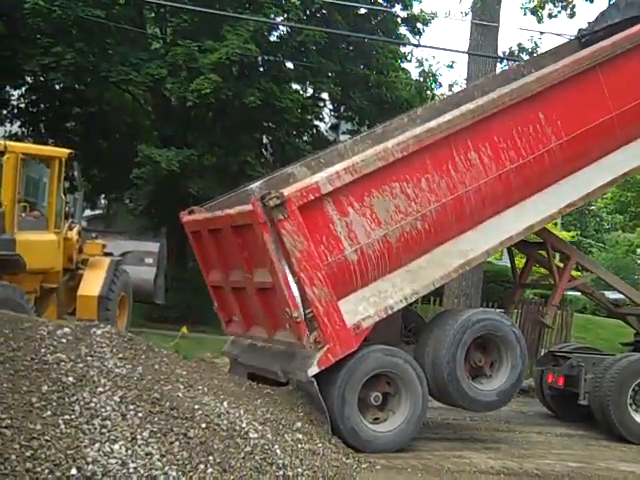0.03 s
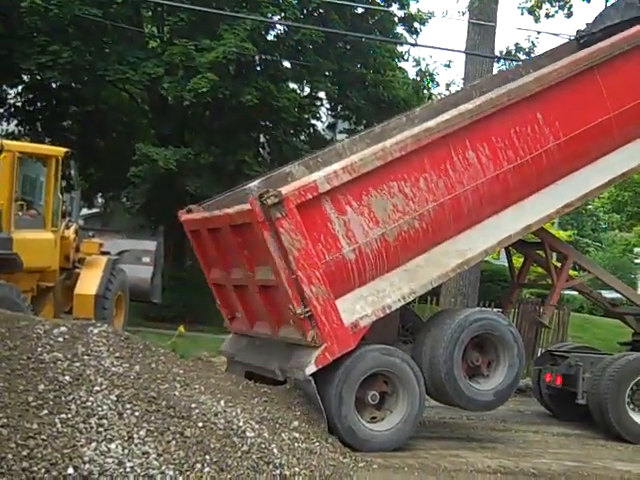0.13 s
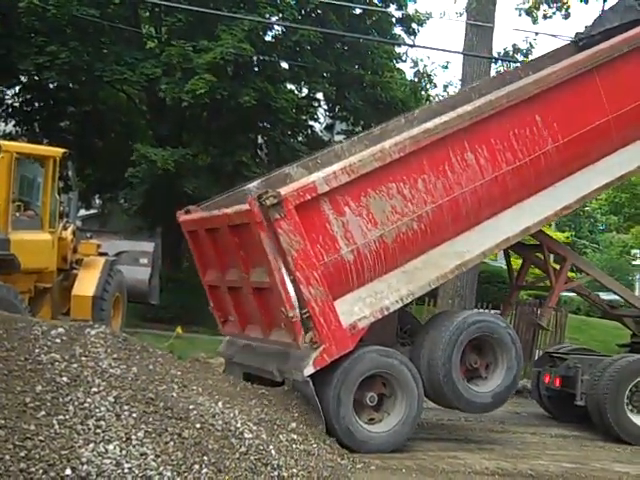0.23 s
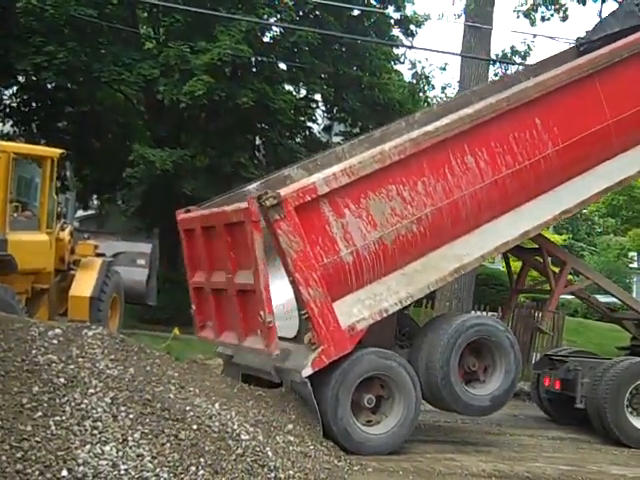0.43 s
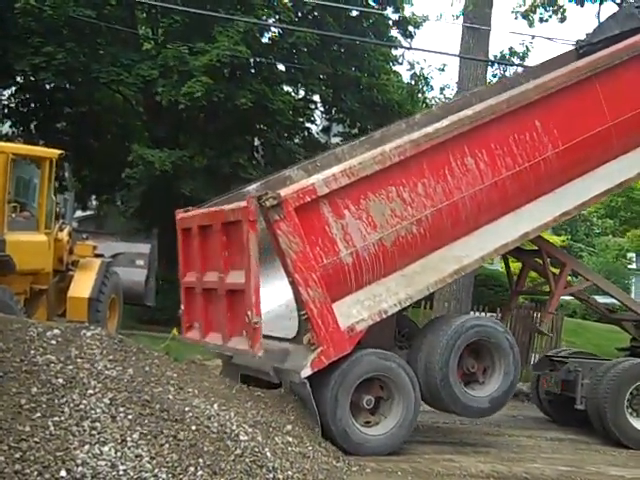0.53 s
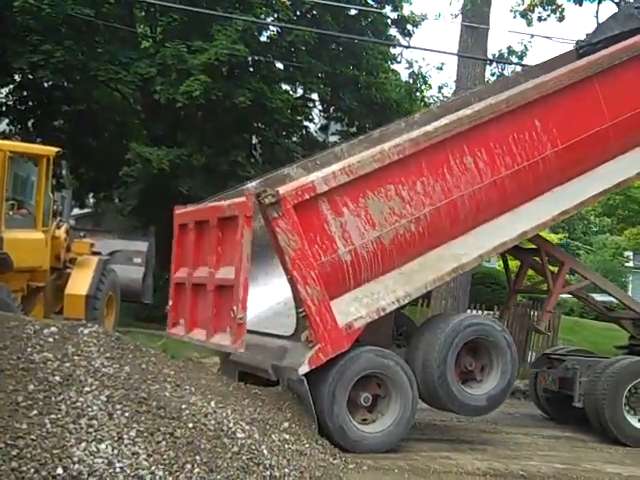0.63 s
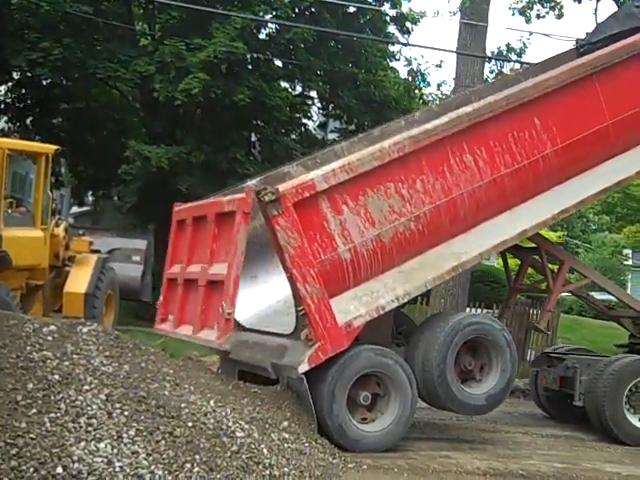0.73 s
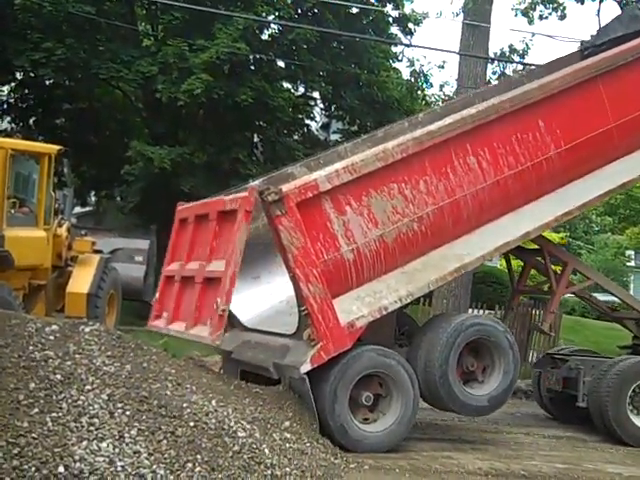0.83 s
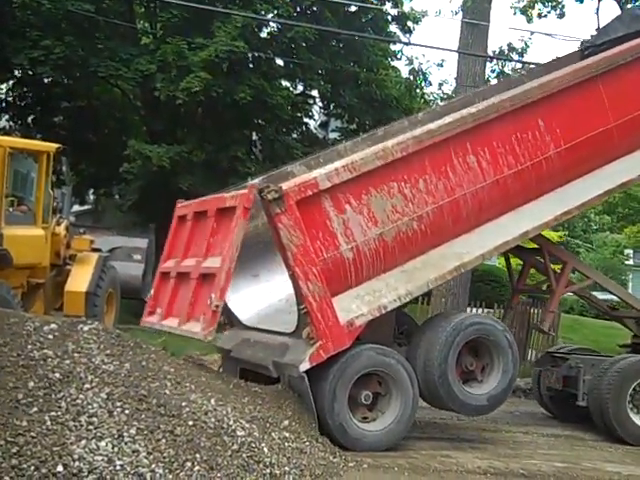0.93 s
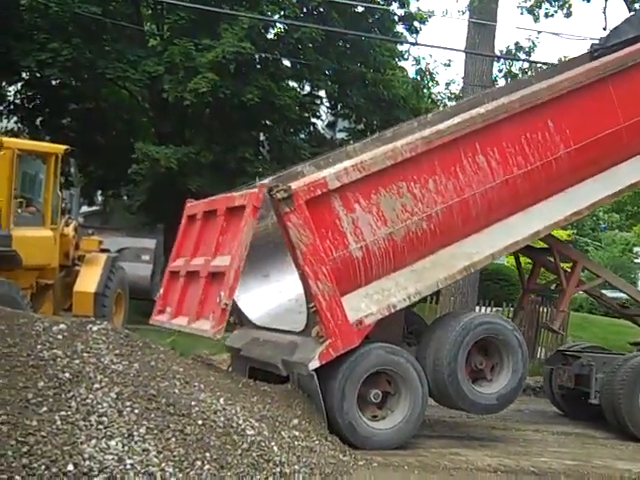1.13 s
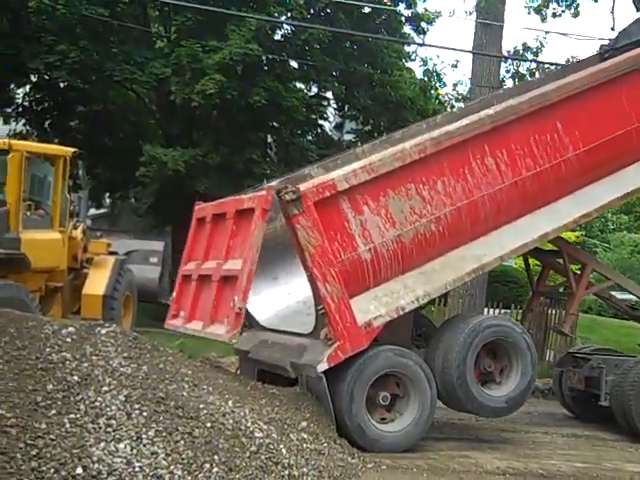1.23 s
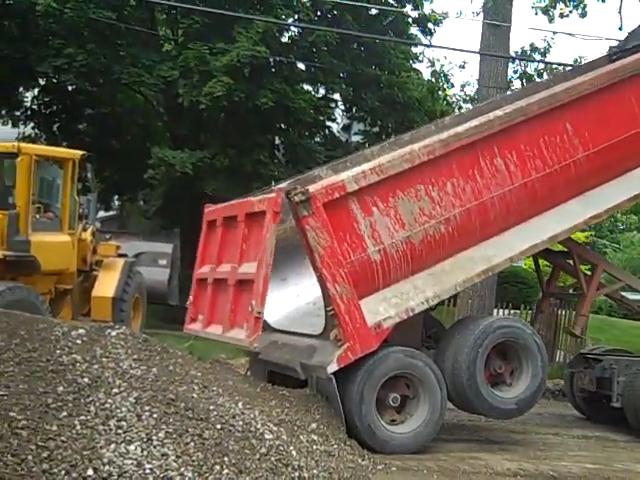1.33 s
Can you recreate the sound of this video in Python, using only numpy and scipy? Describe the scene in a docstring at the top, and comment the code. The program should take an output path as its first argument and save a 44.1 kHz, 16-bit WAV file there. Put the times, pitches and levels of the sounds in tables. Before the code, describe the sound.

Loud clanging tailgate bang on a hollow truck bed, long rumbling ring, rattling diesel engine throughout

```python
"""A six-cylinder diesel idles throughout: a hum, a pulsing roar and parts that rattle at each firing.
Early on, a dump truck's tailgate slams on the raised bed: bursts of noise crash, steel modes ring.
The camera clips the blow and its gain control ducks, then creeps back as bed and gravel yard boom on.
Half a second in, something small scratches near the left microphone port: clicks ring in both ports.
Late on, a latch knocks and bounces, made of short noise, and the hinge gives faint wavering whistles."""
import sys
import numpy as np
from scipy import signal
from scipy.fft import rfft, irfft, next_fast_len
from scipy.io import wavfile
from scipy.ndimage import map_coordinates

SR = 44100
rng = np.random.default_rng(int(sys.argv[2]) if len(sys.argv) > 2 else 0)


def wav_out(sig):
    """Save sig, one row per channel (or a flat mono array), as 16-bit PCM at SR to the path in sys.argv[1]."""
    wavfile.write(sys.argv[1], SR, np.round(np.clip(np.atleast_2d(sig).T, -1, 1) * 32767).astype(np.int16))


def decibels_to_gain(level_db):
    """Convert a level in decibels to a linear amplitude gain (20 dB per decade)."""
    exponent = np.asarray(level_db, float) / 20
    return 10 ** exponent


N = 61739  # length in samples, about 1.4 s

# Strength of each cylinder in turn. Each entry: level in dB, relative.
CYLINDER_DB = [0, -2, -1, -3, -3, -1]
# Tones of the firing hum. Each row: multiple of the firing rate, level in dB rms before it swells.
HUM_TONES = [(1, -32), (2, -42.5), (3, -69), (4, -42.5)]
# How the firing hum swells and fades. Each row: time in seconds, change in dB.
HUM_SWELL = [(0, -3), (.136, -3), (.18, -12), (.29, 13), (.43, -5.5), (.55, 12), (.614, -11), (.66, 8),
             (.77, -17), (.816, 9.5), (.868, 6), (.906, 0), (.964, 1.5), (1.078, -7), (1.25, 2), (1.32, -6),
             (1.36, 1.5), (1.4, -2)]
# Colour of engine, fan and yard together. Each row: frequency in Hz, relative level in dB per Hz.
ROAR_COLOUR = [(20, -31), (35, -9), (59, -9), (85, -1.5), (130, -8.5), (211, -11), (350, -10), (600, -19.5),
               (912, -16), (1730, -17), (2100, -13), (2870, -18), (6550, -19.5), (8300, -27), (9500, -38.5),
               (14600, -56)]
# Engine parts rung by each firing. Each row: frequency in Hz, width in Hz of one resonance pass,
# level in dB rms before the rattle swings, share of the rattle swings from 0 to 1.
ENGINE_PARTS = [(846, 215, -38, 0.19), (1969, 114, -28, 0.72), (6400, 1000, -37.5, 0.23)]
# How hard the parts rattle. Each row: time in seconds, change in dB before each part's share.
RATTLE_SWINGS = [(0, -5), (.06, 0.5), (.2, -10), (.65, -14), (.705, 5), (.76, -11), (.815, 6.5),
                 (.878, -16), (.887, 21.5), (.905, -2), (.945, -26), (.975, 4), (1.01, 0), (1.035, -7),
                 (1.075, 4), (1.12, -29), (1.19, -3), (1.225, -2), (1.27, 0), (1.308, -21), (1.354, -1),
                 (1.4, -10)]
# How alike left and right noise are. Each row: frequency in Hz, likeness where 1 is identical.
LEFT_RIGHT_LIKENESS = [(40, 0.83), (150, 1), (600, 1), (1500, 0.97), (3000, 0.72), (6000, 0.41),
                       (12000, 0.83)]
# The latch knock and its bounce. Each row: time in seconds, level in dB.
KNOCKS = [(1.0235, -17), (1.043, -23)]
# Colour of the knock. Each row: frequency in Hz, relative level in dB per Hz.
KNOCK_COLOUR = [(550, -30), (750, -1), (1000, -5), (1400, 0), (2400, -2), (3200, -20), (7000, -21),
                (9000, -29), (12500, -33), (14000, -60)]
# How long the knock rings. Each row: frequency in Hz, time to fall 60 dB in seconds.
KNOCK_T60 = [(600, .05), (830, .2), (980, .04), (2300, .04), (6000, .6)]
# Squeaks of the hinge. Each row: start in seconds, end in seconds, frequency in Hz,
# level in dB rms before the fade in and out.
HINGE_SQUEAKS = [(1.05, 1.12, 4170, -28), (1.02, 1.05, 5930, -28), (1.1, 1.14, 5930, -29),
                 (1.04, 1.065, 6280, -29), (1.08, 1.13, 4860, -32)]
# Small slips of the scratching thing. Each row: time in seconds, relative level in dB.
SCRATCH_SLIPS = [(.538, -15), (.5395, -12), (.559, -13), (.5645, -5), (.5655, -8), (.568, -20), (.581, -21),
                 (.5895, -19), (.5925, -16), (.5955, -6), (.599, -19), (.6047, -2), (.6105, -13),
                 (.6135, -10), (.6175, -12), (.6215, -13), (.6295, -18), (.6325, -17), (.637, -12),
                 (.641, -16)]
# Resonances of the left port. Each row: frequency in Hz, width in Hz of one pass, level in dB.
LEFT_PORT = [(3480, 740, -8), (6540, 630, -16), (7660, 1100, 5.5)]
# Resonances of the right port. Each row: frequency in Hz, width in Hz of one pass, level in dB.
RIGHT_PORT = [(4000, 920, -35), (6570, 170, 0), (7500, 460, -12)]
# The gate's edge meets the bed along its length. Each row: time in seconds, level in dB.
SLAM_CONTACTS = [(.2158, 0), (.2185, -5), (.2225, -5), (.2335, -11)]
# Colour of the crash. Each row: frequency in Hz, relative level in dB per Hz.
CRASH_COLOUR = [(24, -18), (45, -8.5), (160, -6.5), (290, -11.5), (430, -8), (600, -19), (710, -10),
                (990, -12.5), (1150, -17), (1350, -15.5), (1580, -10.5), (1790, -20), (2180, -10),
                (3080, -12.5), (6780, -12), (9500, -19), (14600, -31)]
# How long the crash rings. Each row: frequency in Hz, time to fall 60 dB in seconds.
CRASH_T60 = [(100, 0.95), (400, 0.95), (1500, 0.24), (4000, 0.12), (8000, 0.11), (14000, 0.033)]
# How long the yard's echo and rumble last. Each row: frequency in Hz, time to fall 60 dB in seconds.
YARD_T60 = [(100, 5), (400, 3.44), (1000, 1.63), (2500, 0.4), (7000, 0.42), (13000, 0.096)]
# Short modes of the gate. Each row: frequency in Hz, level in dB, time to fall 60 dB in seconds.
GATE_MODES = [(55, -16, .5), (172, 6, .13), (250, -10, .12), (375, -5, .3), (420, 2, .14), (510, -7, .18),
              (700, -12, .25), (830, -12, .3), (1017, -14, .4)]
# Long modes of the bed. Each row: frequency in Hz, level in dB, time to fall 60 dB in seconds,
# the last two before flutter and shudder.
BED_MODES = [(118, -10, 1.88), (190.2, -12, 2.7), (218, -19.5, 4.3), (250.5, -21.5, 4.2),
             (290.9, -25.5, 16), (338, -20, 3.37), (365.5, -12.5, 1.38), (393, -22, 1.6), (417.6, -25, 1.1),
             (442.3, -21, 2.63), (474.4, -20.5, 2), (725, -27, 0.94), (757, -23, 1.44), (823, -27.5, 2.2),
             (878, -27.5, 2.2), (960, -28, 1.5)]
# The bed's steadiest modes, a pair that beats. Each row: frequency in Hz, level in dB,
# time to fall 60 dB in seconds, the last two before the shudder.
FLOOR_PLATE_MODES = [(151, -7.5, 2.4), (162.6, -14, 2.4)]
# The bed rocks on its ram and the boom sways. Each row: time in seconds, change in dB.
BED_SHUDDER = [(.2, -10), (.3, 0.5), (.42, -1), (.5, -3), (.56, 1), (.7, -2.5), (.74, -1), (.86, -4),
               (.895, -7), (1.1, -8.5), (1.4, -7.5)]
# Colour of the left port over the right. Each row: frequency in Hz, difference in dB.
LEFT_OVER_RIGHT = [(60, -3.5), (200, -0.5), (1250, -1), (4200, -2), (6500, -8), (7700, 10.5), (8800, 8),
                   (10500, 11.5), (14000, 12.5)]


def unit(x):
    """Scale to rms 1."""
    return x / np.sqrt(np.mean(x ** 2) + 1e-20)


def along(points, hz):
    """Read (Hz, value) points on a log frequency axis."""
    f, v = np.transpose(points)
    return np.interp(np.log(hz + 1), np.log(f + 1), v)


def over_time(points):
    """Join (seconds, value) points by straight lines."""
    return np.interp(np.arange(N) / SR, *np.transpose(points))


def wobble(rate):
    """A smooth random curve with `rate` random knots a second, at most 60."""
    knots = rng.standard_normal(100)
    return map_coordinates(knots, [np.arange(N) * min(rate, 60) / SR])


def filtered(x, response):
    """Multiply the spectrum of x by a complex response of frequency."""
    m = next_fast_len(N + 8192)
    return irfft(rfft(x, m) * response(np.fft.rfftfreq(m, 1 / SR)), m)[..., :N]


def peak(f, centre, width):
    """Response of one resonance, which rings only after it is struck."""
    return 1j * f * width / (centre * centre - f * f + 1j * f * width)


def pair(colour):
    """Coloured stereo noise of rms 1; a shared and an opposed part set how alike the sides are."""
    def shares(hz):
        angle = np.arccos(np.clip(along(LEFT_RIGHT_LIKENESS, hz), -1, 1)) / 2
        return decibels_to_gain(along(colour, hz)) * [np.cos(angle), np.sin(angle)]

    mid, side = filtered(rng.standard_normal((2, N)), shares)
    return unit(np.array([mid + side, mid - side]))


def dying(start, colour, t60s):
    """Stereo noise that starts at once and dies at its own pace in each frequency band."""
    hz, t, bands = signal.stft(pair(colour), SR, nperseg=256)
    t60 = np.maximum(along(t60s, hz), .01)[:, None]
    tail = signal.istft(bands * decibels_to_gain(-60 * t / t60), SR, nperseg=256)[1]
    return np.pad(tail, ((0, 0), (round(start * SR), 0)))[:, :N]


def ring(start, modes, attack, flutter_db=0, wander_rad=0, spread_rad=0):
    """Struck steel: each mode is a dying sine, whose level and phase may wander alike in both ports."""
    flutter_rate = 18  # knots a second
    t = np.maximum(np.arange(N) / SR - start, 0)
    total = 0
    for hz, db, t60 in modes:
        level = decibels_to_gain(db - 60 * t / t60 + flutter_db * wobble(flutter_rate))
        # with spread, a random starting phase, slightly apart in the two ports
        phase = spread_rad * (30 * rng.normal() + rng.normal(size=(2, 1)))
        phase = phase + wander_rad * wobble(flutter_rate)
        total = total + level * np.sin(2 * np.pi * hz * t + phase)
    return -(1 - np.exp(-t / attack)) * total


def engine():
    """Firings make a hum of a few multiples, a pulsing roar of noise, and ringing in engine parts."""
    firing_hz, firing_share = 65.4, 0.28  # firings a second; part of the roar that pulses
    turns = firing_hz * np.arange(N) / SR + 0.086 * wobble(5.5)  # firings so far, slightly uneven
    hum = 0
    for multiple, db in HUM_TONES:
        level = decibels_to_gain(db + wobble(7.7))  # wavers by about 1 dB
        hum = hum + level * np.sqrt(2) * np.sin(2 * np.pi * multiple * turns)
    hum = decibels_to_gain(over_time(HUM_SWELL)) * hum

    cylinder = np.floor(turns).astype(int) % len(CYLINDER_DB)
    strength = decibels_to_gain(np.array(CYLINDER_DB)[cylinder])
    beat = unit(strength * np.exp(-1.5 * (turns % 1)))  # each firing jumps up, then dies

    roar_level = decibels_to_gain(-25.5 + wobble(6.88))  # wavers by about 1 dB
    roar = roar_level * (1 - firing_share + firing_share * beat) * pair(ROAR_COLOUR)

    swing_db = over_time(RATTLE_SWINGS)
    parts = 0
    for centre, width, db, share in ENGINE_PARTS:
        blows = beat * pair([(100, 0)])  # pulsing noise, equally strong at all frequencies
        rung = unit(filtered(blows, lambda f: peak(f, centre, width) ** 2))
        parts = parts + decibels_to_gain(db + share * swing_db) * rung
    return hum + roar + parts


def latch():
    """Short noise makes a dull knock and its bounce; sines of ragged phase make the hinge squeak."""
    t = np.arange(N) / SR
    knocks = sum(decibels_to_gain(db) * dying(start, KNOCK_COLOUR, KNOCK_T60) for start, db in KNOCKS)
    squeaks = 0
    for start, end, hz, db in HINGE_SQUEAKS:
        fade = np.sin(np.pi * np.clip((t - start) / (end - start), 0, 1))
        tone = unit(np.sin(2 * np.pi * hz * t + 0.8 * wobble(53.6)))
        squeaks = squeaks + decibels_to_gain(db) * fade * tone
    return knocks + squeaks


def scratch():
    """Tiny slips, each three uneven clicks, and finer single ones set the two ports ringing."""
    start, db = np.transpose(SCRATCH_SLIPS)
    # the first click is on time; the others scatter by about 0.4 and 0.8 ms
    scatter = .0004 * rng.standard_normal((len(start), 3)) * [0, 1, 2]
    when = (start[:, None] + scatter).ravel()
    size = (decibels_to_gain(db)[:, None] * [1, -.35, .25]).ravel()

    drag_start, drag_end, drag_count = .587, .644, 70  # s, s, number of finer slips
    when = np.append(when, rng.uniform(drag_start, drag_end, drag_count))
    size = np.append(size, decibels_to_gain(-25) * rng.standard_normal(drag_count))
    slips = decibels_to_gain(27.5) * np.bincount(np.round(when * SR).astype(int), size, N)

    def port(table):
        def response(f):
            rings = sum(decibels_to_gain(db) * peak(f, centre, width) ** 2 for centre, width, db in table)
            return rings / (1 + (f / 8020) ** 20)  # steep loss above 8020 Hz
        return filtered(slips, response)

    return np.array([port(LEFT_PORT), port(RIGHT_PORT)])


def tailgate():
    """Steel contact crashes as noise, gate and bed ring in their modes, and the yard answers as noise."""
    start = SLAM_CONTACTS[0][0]
    crash = sum(decibels_to_gain(db) * dying(s, CRASH_COLOUR, CRASH_T60) for s, db in SLAM_CONTACTS)
    gate = ring(start + .0038, GATE_MODES, attack=.0031)  # the gate bows 3.8 ms after contact
    bed = ring(start, BED_MODES, attack=.015, flutter_db=3, wander_rad=.5, spread_rad=.2445)
    plate = ring(start, FLOOR_PLATE_MODES, attack=.13)  # swells slowly
    echo = dying(start + .01, CRASH_COLOUR, YARD_T60)
    yard = decibels_to_gain(-6) * filtered(echo, lambda f: f / (f - 1j * 300))  # little below 300 Hz
    return crash + gate + decibels_to_gain(over_time(BED_SHUDDER)) * (bed + plate + yard)


def scene():
    """Engine and latch lie to the right, so reach the left port late; the ports differ in colour."""
    left_lag_s = 4 / SR
    lags = left_lag_s * np.array([[1], [0]])
    right = filtered(engine() + latch(), lambda f: np.exp(-2j * np.pi * f * lags))
    halves = np.array([[.5], [-.5]])  # each port takes half of the difference
    coloured = filtered(right + tailgate(), lambda f: decibels_to_gain(along(LEFT_OVER_RIGHT, f) * halves))
    return coloured + scratch()


def lag(x, seconds):
    """Follow x sluggishly, with a time constant in seconds."""
    step = 1 / (seconds * SR)
    return signal.lfilter([step], [1, step - 1], x)


def low_pass(x):
    """Removes everything above the highest recorded frequency."""
    return signal.sosfilt(signal.butter(12, 14720, fs=SR, output="sos"), x)


def record(dry):
    """Gain control ducks late after loud sound and recovers slowly; then peaks are clipped near 1."""
    level_db = 10 * np.log10(lag(np.mean(dry ** 2, 0), .034) + 1e-9)
    over_db = np.maximum(level_db + 20, 0)  # excess above -20 dB
    ramp = 35.5 * np.arange(N) / SR
    held_db = np.maximum.accumulate(over_db + ramp) - ramp  # the excess may sink by 35.5 dB a second
    ducked = dry * decibels_to_gain(-0.56 * lag(held_db, .022))  # 0.56 dB down for each dB of held excess
    hardness = 37  # high: bends only close to the limit
    clipped = ducked / (1 + np.abs(ducked) ** hardness) ** (1 / hardness)
    return low_pass(clipped)


dry = scene()
out = record(dry)
wav_out(out)
```